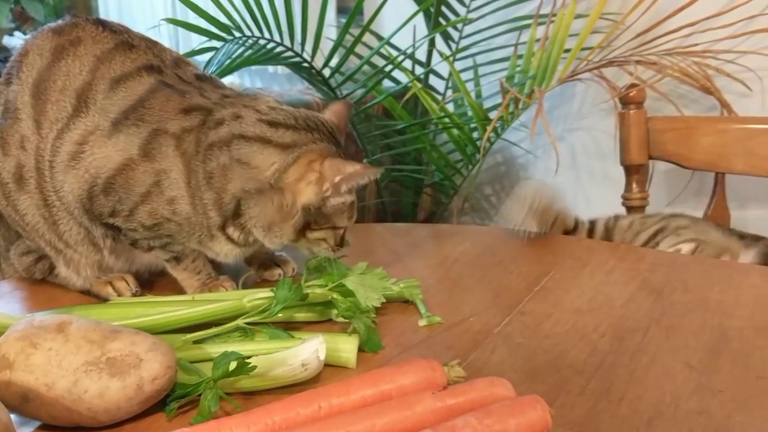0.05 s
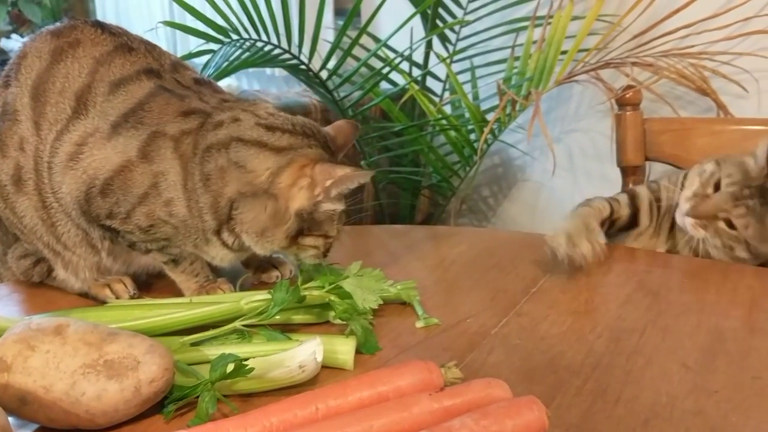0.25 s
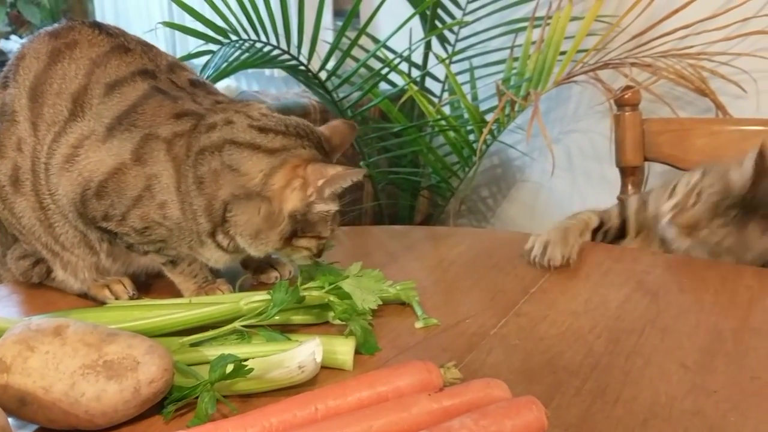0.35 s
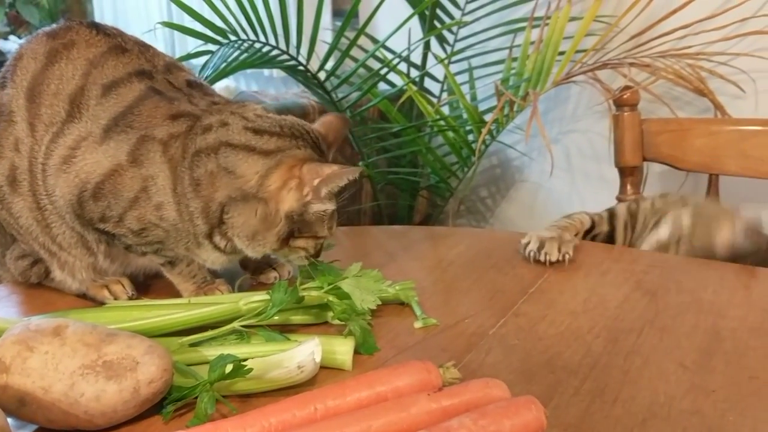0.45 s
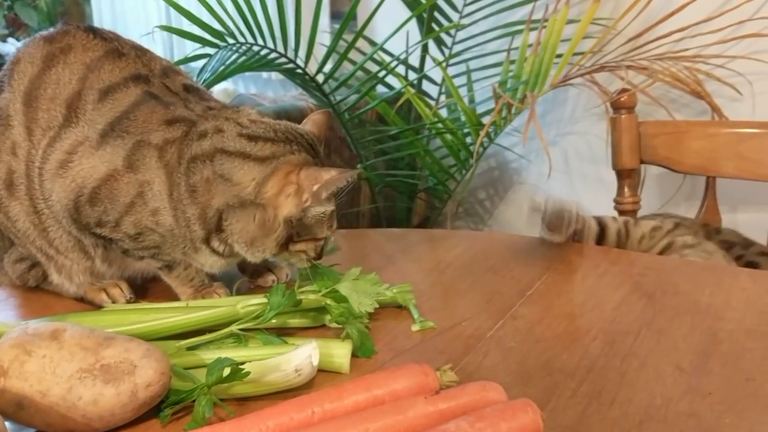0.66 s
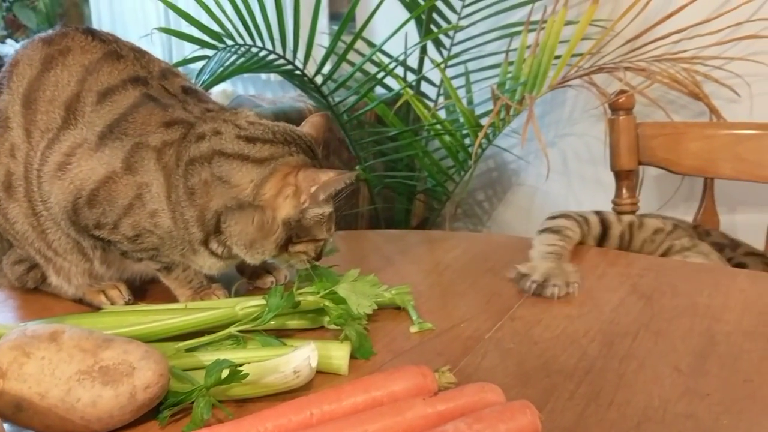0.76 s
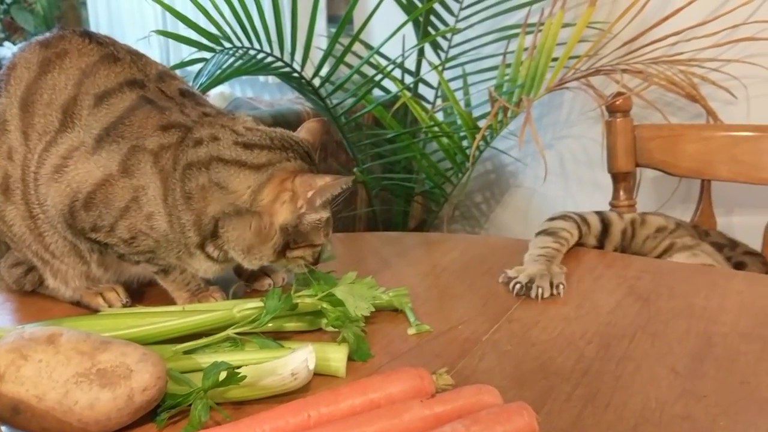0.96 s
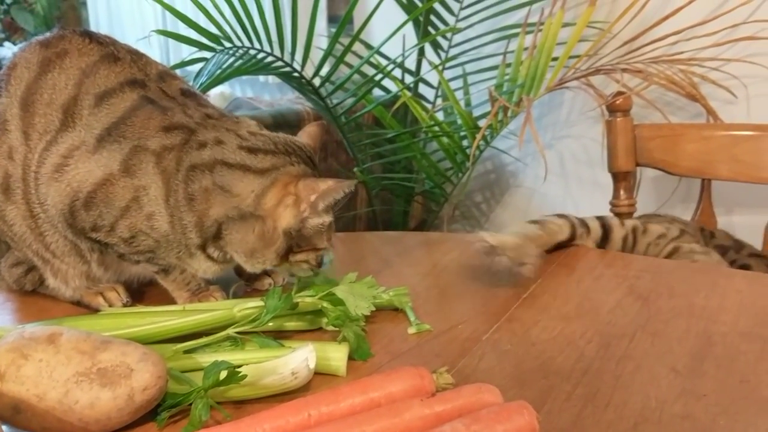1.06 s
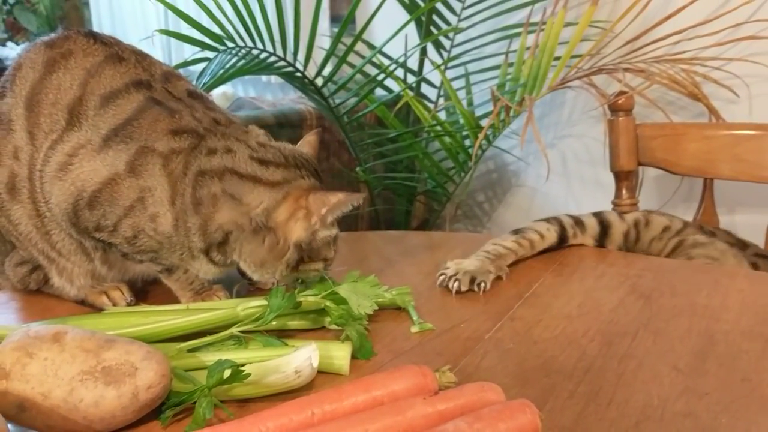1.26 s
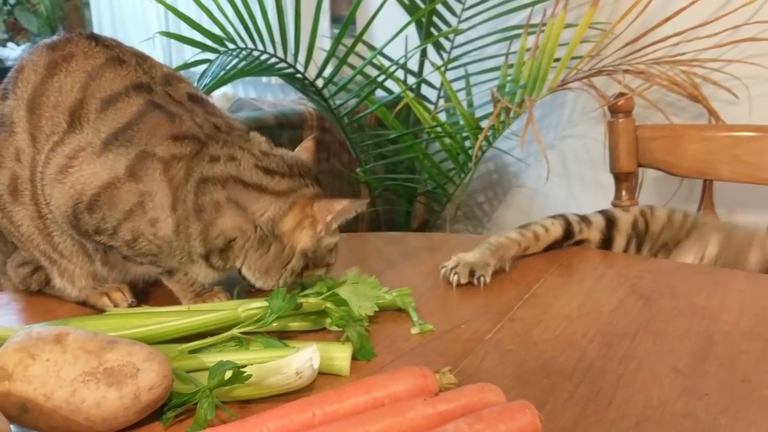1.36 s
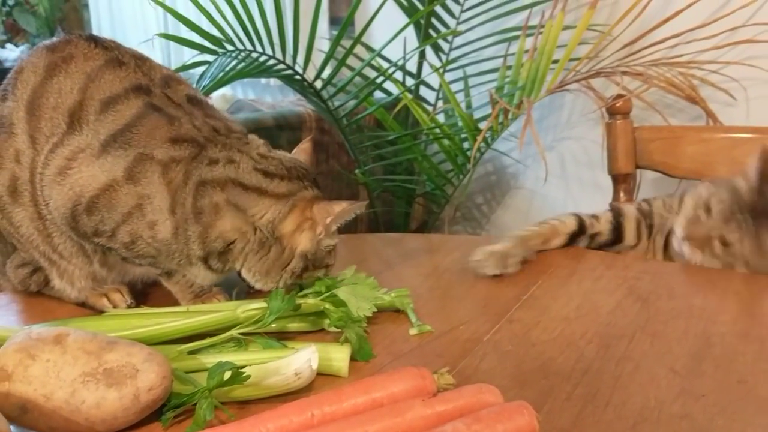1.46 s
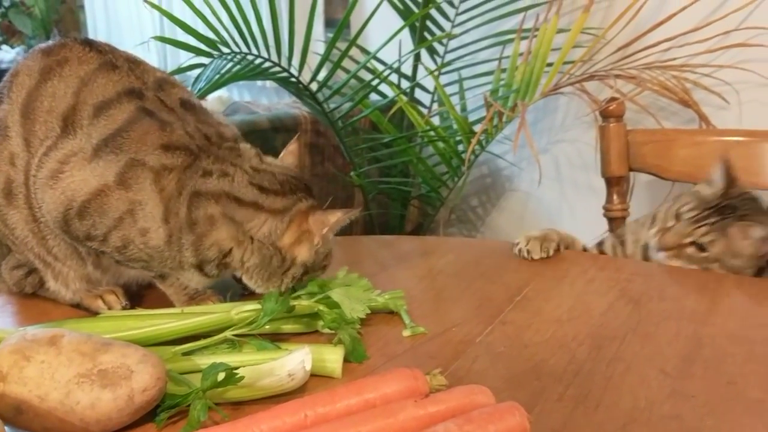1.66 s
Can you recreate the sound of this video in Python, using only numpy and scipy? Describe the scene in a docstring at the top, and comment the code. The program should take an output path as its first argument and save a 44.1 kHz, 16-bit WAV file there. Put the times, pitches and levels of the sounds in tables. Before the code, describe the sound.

Four quick, uneven taps of a cat's paw knock on a wooden tabletop, claws clicking, followed by a faint brush of fur across the wood. A nearby microphone picks up the quiet room's low rumble and slight hiss.

```python
"""A faint brush of a paw over low room rumble, then a cat on a chair pats a wooden dining table four times.
Claws click into the top's short modes, the pad makes it thump and ring, and lighter touches fall between.
Near the end the paw slides back, fur and claws catching on the grain of the wood.
One microphone in a quiet room, near enough for the small touches, with short reflections and a faint hiss."""
import sys
import numpy as np
from scipy import signal
from scipy.fft import rfft, irfft
from scipy.io import wavfile

SR = 44100
rng = np.random.default_rng(int(sys.argv[2]) if len(sys.argv) > 2 else 0)


def unload_wav(signal):
    """Save mono or channel-first audio to the path in sys.argv[1] as 16-bit WAV at rate SR, clipped to [-1, 1]."""
    wavfile.write(
        sys.argv[1],
        SR,
        np.round(np.clip(np.atleast_2d(signal).T, -1, 1) * 32767).astype(np.int16),
    )


N = 74970
T = np.arange(N) / SR
CUTOFF_HZ = 16000
THUMP_HZ, KNOCK_HZ, WOOD_HZ, CLICK_HZ, TICK_HZ = 150, 720, 2300, 4900, 9450   # registers of a contact
WOOD_T60_S, WOOD_DAMPING = 0.039, 0.53   # ring time at WOOD_HZ; power by which it shortens with pitch
# Colour of the top's many weak, short modes. Each row: frequency in Hz, relative level per octave in dB.
WOOD_SPECTRUM = [(250, -1.5), (450, -11.5), (850, 1.5), (1150, -1.5), (1500, -1), (2000, 2), (3000, 1),
                 (3650, 2), (4300, 5.5), (5200, 1), (6300, 6), (7600, 0.5), (10500, 4.5), (16000, -4)]


def from_db(db):
    """Decibels to gain."""
    return 10 ** (np.asarray(db) / 20)


def at_hz(points, hz, column=1):
    """Read a table column on a log-frequency axis."""
    points = np.array(points)
    return np.interp(np.log(hz), np.log(points[:, 0]), points[:, column])


def add(out, start_s, sound):
    """Mix a sound in at a time."""
    i = max(int(start_s * SR), 0)
    part = sound[:max(N - i, 0)]
    out[i:i + len(part)] += part


def coloured(x, spectrum):
    """Give a steady signal a spectrum, at rms 1."""
    hz = np.maximum(np.fft.rfftfreq(N, 1 / SR), 1)
    shaped = irfft(rfft(x) * from_db(at_hz(spectrum, hz)), N)
    return shaped / np.sqrt(np.mean(shaped ** 2) + 1e-20)


def ringing(hz, t60, t):
    """One dying sine of starting rms 1 per mode."""
    return np.sqrt(2) * np.sin(2 * np.pi * hz[:, None] * t) * from_db(-60 * t / t60[:, None])


def room_tone():
    """Low rumble of the house, slowly wavering, and a faint steady hiss."""
    # Colours of the two noises. Each row: frequency in Hz, relative spectral density in dB.
    rumble_spectrum = [(20, -37), (35, -21), (48, -11), (62, -1.5), (80, -13), (110, -12), (170, -22),
                       (300, -54.5)]
    hiss_spectrum = [(88, -63), (150, 0), (291, -3.5), (414, -8.5), (649, -12.5), (716, -9), (888, -10.5),
                     (1060, -12), (1450, -14), (3770, -19), (4860, -22), (6260, -23), (16000, -29)]
    # The rumble's wavering. Each row: time in seconds, level in dB.
    rumble_levels = [(0, -64), (0.3, -62.5), (0.6, -65.5), (0.95, -69.5), (1.25, -61.5), (1.42, -61.5),
                     (1.7, -68)]
    waver = from_db(np.interp(T, *np.transpose(rumble_levels)))
    rumble = waver * coloured(rng.standard_normal(N), rumble_spectrum)
    hiss = from_db(-67) * coloured(rng.standard_normal(N), hiss_spectrum)
    return rumble + hiss


def reflections(x, bands=14, onset_s=0.0026, build_s=0.001):
    """The room returns diffuse sound to the microphone, each half octave dying at its own pace."""
    # The room's reverberation. Each row: frequency in Hz, gain in dB, time to fall 60 dB in seconds.
    reverb = [(120, -4, 0.21), (397, -3.5, 0.36), (1060, -8, 0.33), (2150, -8, 0.26), (4340, -8, 0.26),
              (7900, -9, 0.2), (15000, -7, 0.17)]
    t, response = T[:SR // 2], 0
    edges = np.geomspace(CUTOFF_HZ / 2 ** (bands / 2), CUTOFF_HZ, bands + 1)
    build = 1 - np.exp(-np.maximum(t - onset_s, 0) / build_s)
    for low, high in zip(edges, edges[1:]):
        hz = np.sqrt(low * high)
        fade = build * np.exp(-np.log(1000) * t / at_hz(reverb, hz, column=2))
        bandpass = signal.butter(2, [low, high], "band", fs=SR, output="sos")
        band = signal.sosfilt(bandpass, rng.standard_normal(len(t)) * fade)
        gain = np.sqrt(2 * (high - low) / SR) * from_db(at_hz(reverb, hz))
        response = response + gain * band / np.linalg.norm(band)
    return signal.fftconvolve(x, response)[:N]


def paw_slides(slips_per_s=17000, spread_db=7):
    """Fur and claws catch on the grain in tiny slips; each stroke swells and fades."""
    # Strokes over the wood. Each row: start in seconds, length in seconds, level at mid-stroke in dB.
    strokes = [(0.0, 0.083, -69.5), (0.466, 0.12, -65.5), (1.032, 0.018, -66.5), (1.37, 0.074, -67),
               (1.433, 0.095, -64)]
    # Colour of the rubbing. Each row: frequency in Hz, relative spectral density in dB.
    friction_spectrum = [(200, -8), (700, -5.5), (1900, -5.5), (2700, -10.5), (4000, -10.5), (4400, -4.5),
                         (4900, -10.5), (6400, -10), (7500, -22.5), (16000, -23)]
    catches = rng.random(N) < slips_per_s / SR
    slips = catches * rng.standard_normal(N) * from_db(spread_db * rng.standard_normal(N))
    level = np.zeros(N)
    for start_s, length_s, db in strokes:
        progress = np.clip((T - start_s) / length_s, 0, 1)
        level += from_db(db) * np.sqrt(np.abs(np.sin(np.pi * progress)))
    return level * coloured(slips, friction_spectrum)


def pad_bumps(t60_s=0.13):
    """The soft pad and leg press on the top and wake only a low note."""
    # Soft pushes. Each row: start in seconds, level in dB, pitch in Hz.
    pushes = [(0.08, -84, 120), (0.223, -45, 150), (0.241, -45, 104), (0.434, -45, 96), (0.748, -65, 158),
              (0.769, -38.5, 104), (1.144, -47.5, 141.3), (1.189, -51.5, 96), (1.642, -47.5, 117)]
    out = np.zeros(N)
    for start_s, db, hz in pushes:
        note = ringing(np.array([hz]), np.array([t60_s]), T)[0]
        swell = 1 - np.exp(-2 * T * hz)
        add(out, start_s, from_db(db) * note * swell)
    return out


def wood_t60(hz):
    """Seconds a short mode takes to fall 60 dB: the higher, the sooner."""
    return WOOD_T60_S * (WOOD_HZ / hz) ** WOOD_DAMPING


def short_modes(count=480, octaves=6):
    """The dense modes that make the wood clack: their pitches and their ringing."""
    hz = CUTOFF_HZ * 2 ** (-octaves * (np.arange(count) + rng.random(count)) / count)
    gain = from_db(at_hz(WOOD_SPECTRUM, hz)) * np.sqrt(octaves / count)
    return hz, gain[:, None] * ringing(hz, wood_t60(hz), T[:SR // 10])


def contact_drive(force, spot_hz, spot_db, hz, width_octaves=0.23):
    """How hard a contact drives each pitch: its force spectrum, lifted where the spot answers best."""
    lift_db = spot_db * np.exp(-.5 * (np.log2(hz / spot_hz) / width_octaves) ** 2)
    return from_db(at_hz(force, hz) + lift_db)


def radiated_pulse(force, spot_hz, spot_db, size=256):
    """One short pulse with the colour and energy of a whole clack, as the room receives it."""
    hz = np.fft.rfftfreq(size, 1 / SR) + 1
    colour = contact_drive(force, spot_hz, spot_db, hz) * from_db(at_hz(WOOD_SPECTRUM, hz))
    low_cut = hz ** 2 / (hz ** 2 + THUMP_HZ ** 2)
    energy_per_hz = wood_t60(hz) / (4 * np.log(1000) * np.log(2) * hz)
    gain = colour * low_cut * SR * np.sqrt(energy_per_hz)
    cosines = np.cos(2 * np.pi * hz[:, None] * (T[:size] - T[size // 2]))
    return gain @ cosines * 2 / size


def paw_taps(claws=3, claw_gap_s=.0012, claw_loss_db=2.27, snap=0.2, swell_cycles=1.7, spread_db=3):
    """Claws land in a quick run while the top's strong modes swell and ring: direct sound, room feed."""
    # Paw contacts. Each row: start in seconds, level in dB, thump, knock, click and tick in dB
    # relative to that level, the pitch the spot favours in Hz, its lift in dB.
    contacts = [(0.0098, -56.5, -3, -7, -20, -16, 1320, 10.2), (0.073, -62, 4.5, -0.5, -24, -21, 1800, 7.4),
                (0.2053, -31.5, -8.5, -4.5, 3.5, -10.5, 2080, 5.8),
                (0.2104, -53.5, -11, -1, -2, 7.5, 1900, 4),
                (0.4002, -33.5, -15.5, -8.5, -12, -24, 2870, 10.5),
                (0.4089, -47.5, -10.5, -1, -5, -3.5, 1620, 2.7),
                (0.4393, -46.5, -6, -7, -2.5, -15.5, 3390, 7.1), (0.530, -60, -35, -0.5, -7, -12, 2500, 3),
                (0.55, -58, -1, -5, 7.5, -14.5, 6100, 3.2), (0.7376, -39.5, -7, 2.5, 4.5, 4, 1760, 5.3),
                (0.748, -44.5, 1, 0.5, 1, 1, 1100, 6.3), (0.7775, -53, -10, -15, -3, -14, 2000, 3.3),
                (1.141, -47, -19, -12.5, 0.5, 1, 1510, 15.2), (1.148, -44.5, -10.5, -5.5, 6, -1, 1560, 9.8),
                (1.588, -63.5, 6, 4, -16, -15, 1350, 9.9), (1.6128, -60, -4, 2, 4, -1, 2200, 7.2),
                (1.695, -67, -12, -15, -10, -15, 2300, 11.7)]
    # Strong modes of the top. Each row: pitch in Hz, relative level in dB, time to fall 60 dB in seconds.
    strong_modes = [(57.6, -8, 0.39), (118.9, 3, 0.13), (269.3, -4.5, 0.19), (322.5, 1.5, 0.088),
                    (443.5, -9, 0.18), (549.7, -8.5, 0.18), (728.5, -17.5, 0.2), (829.5, -6, 0.1),
                    (953, -12, .14), (1772, -16.5, 0.21), (1861, -4.5, 0.054), (2153, -6.5, 0.048),
                    (3367, -27.5, 0.21), (4200, 0, 0.032)]
    direct, to_room = np.zeros(N), np.zeros(N)
    short_hz, short_ring = short_modes()
    hz, mode_db, t60 = np.transpose(strong_modes)
    t = T[:SR // 2]
    swell = 1 - np.exp(-t * hz[:, None] / swell_cycles)   # the whole top takes time to get moving
    strong_ring = ringing(hz, t60, t) * swell
    claw_gains = from_db(-claw_loss_db * np.arange(claws))
    claw_gains /= np.linalg.norm(claw_gains)
    room_send_db = 0.5
    for start_s, db, thump, knock, click, tick, spot_hz, spot_db in contacts:
        force = [(THUMP_HZ, thump), (KNOCK_HZ, knock), (WOOD_HZ, 0), (CLICK_HZ, click), (TICK_HZ, tick)]
        scatter_db = spread_db * rng.uniform(-1.13, 1, len(hz))   # modes vary from spot to spot
        add(direct, start_s, from_db(db + mode_db + at_hz(force, hz) + scatter_db) @ strong_ring)
        add(to_room, start_s, from_db(db + room_send_db) * radiated_pulse(force, spot_hz, spot_db))
        push = from_db(db) * contact_drive(force, spot_hz, spot_db, short_hz)
        for k, gain in enumerate(claw_gains):
            in_step = snap * (k == 0)   # the first claw moves a share of the modes together
            shape = rng.choice([-1, 1], len(short_hz)) + in_step
            add(direct, start_s + k * claw_gap_s, gain * (shape * push) @ short_ring)
    return direct, to_room


def scene():
    """The paw on the table with the room around it, at one microphone."""
    taps, taps_to_room = paw_taps()
    soft = pad_bumps() + paw_slides()
    return (taps + soft + reflections(taps_to_room + soft) + room_tone())[None]


def record(dry):
    """A steep low-pass after the microphone cuts the highest treble."""
    lowpass = signal.ellip(10, .1, 70, CUTOFF_HZ, fs=SR, output="sos")
    return signal.sosfilt(lowpass, dry)


dry = scene()
out = record(dry)
unload_wav(out)
```